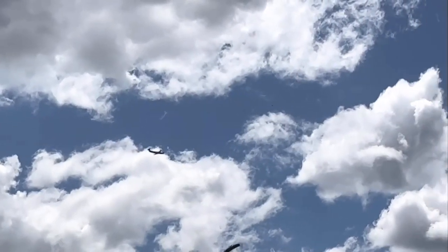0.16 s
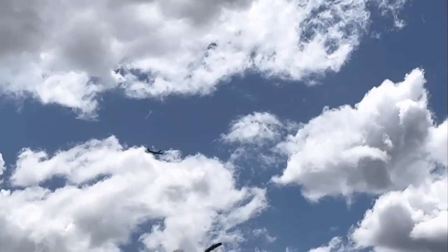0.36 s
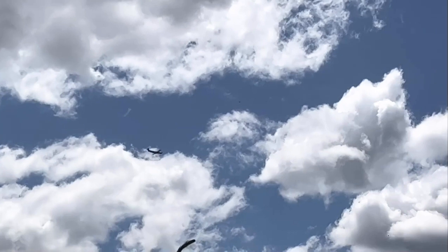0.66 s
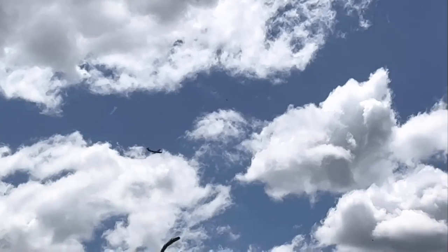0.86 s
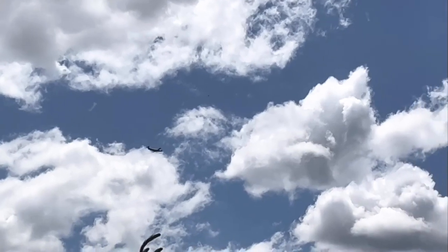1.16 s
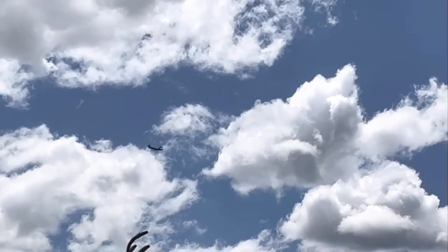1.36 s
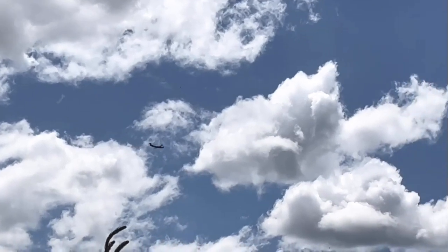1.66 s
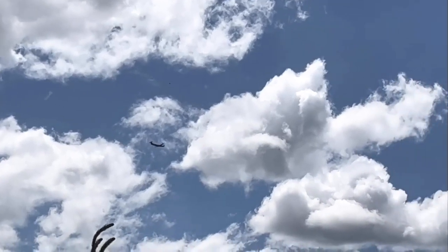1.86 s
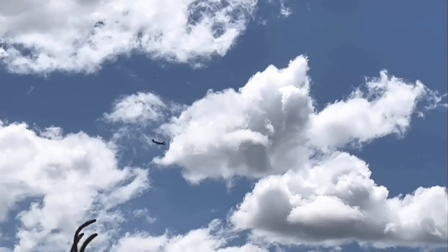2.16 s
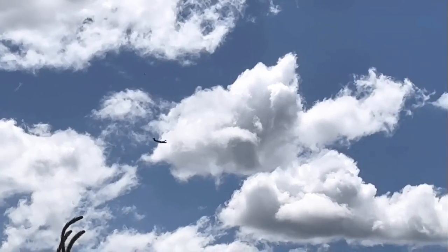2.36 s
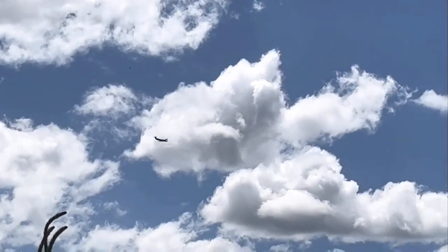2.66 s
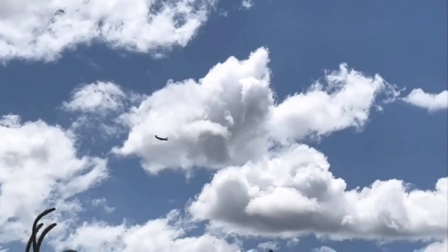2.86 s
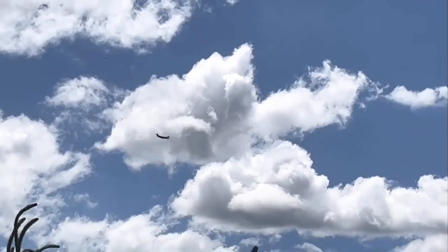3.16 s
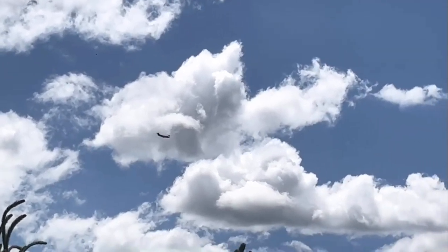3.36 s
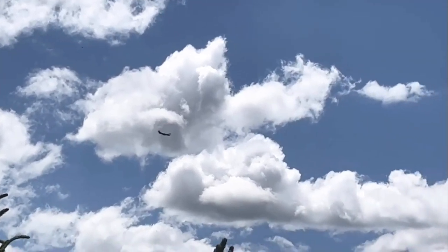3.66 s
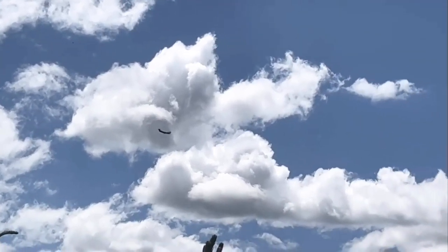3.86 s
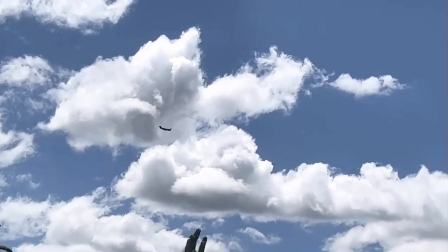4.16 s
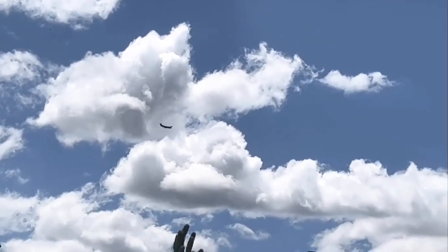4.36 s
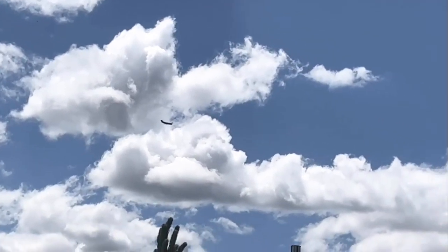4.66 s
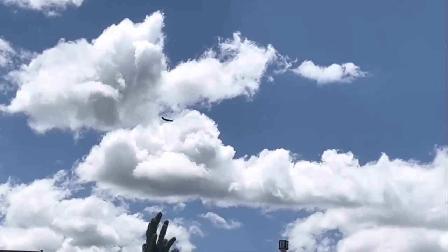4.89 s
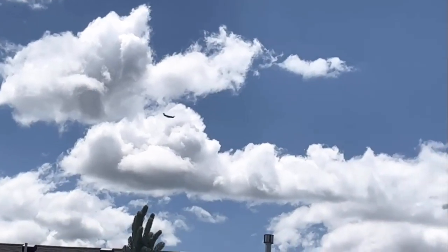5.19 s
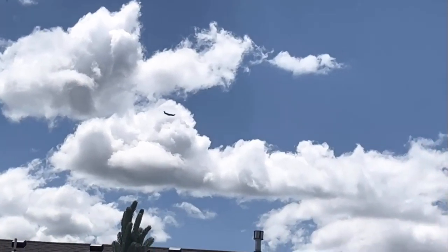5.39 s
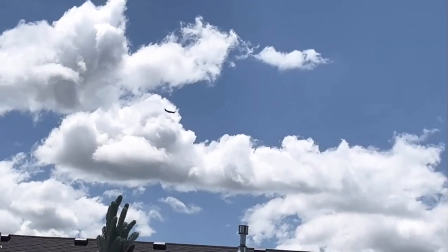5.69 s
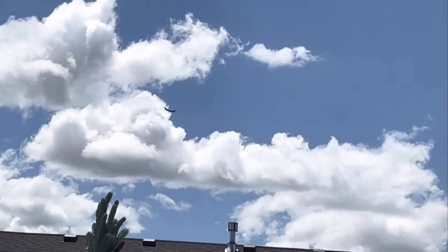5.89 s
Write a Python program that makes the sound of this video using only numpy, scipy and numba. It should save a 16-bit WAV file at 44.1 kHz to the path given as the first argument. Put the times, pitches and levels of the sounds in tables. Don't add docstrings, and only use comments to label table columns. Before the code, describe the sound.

Outdoors in a garden, a distant twin-engine propeller plane climbs away with a low, throbbing drone that slowly sinks in pitch. Its soft airy roar swells and fades unevenly. Wind rumbles on a hand-held phone microphone, with bursts of heavy dull thumps from about one to four seconds. Then wind and plane thin out over a faint steady murmur, with a last small swell of roar.

```python
import sys
import numpy as np
from scipy import signal
from scipy.fft import rfft, irfft, next_fast_len
from scipy.io import wavfile
from scipy.ndimage import uniform_filter1d
from numba import njit

SR = 44100
rng = np.random.default_rng(int(sys.argv[2]) if len(sys.argv) > 2 else 0)


def amplitude_ratio(level_db):
    exponent = np.asarray(level_db, float) / 20
    return 10 ** exponent


def persist_wave(psi):
    counts = np.round(np.clip(psi, -1, 1) * 32767).astype(np.int16)
    wavfile.write(sys.argv[1], SR, np.atleast_2d(counts).T)


N = 265906
TIME_S = np.arange(N) / SR
CONTROL_S = np.arange(0, N, 64) / SR


def level(x, db):
    return x * amplitude_ratio(db) / np.sqrt(np.mean(x ** 2))


def spread(control):
    return np.interp(TIME_S, CONTROL_S, control)


def walk(rate):
    hold = int(SR / rate)
    held = np.repeat(rng.standard_normal(N // hold + 1), hold)
    slewed = uniform_filter1d(uniform_filter1d(held, hold), hold)
    return level(slewed[:N], 0)


def coloured(colour):
    size = next_fast_len(N)
    octave = np.log2(np.maximum(np.arange(size // 2 + 1) * SR / size, 1))
    hz, db = np.transpose(colour)
    gain = amplitude_ratio(np.interp(octave, np.log2(hz), db))
    return rfft(rng.standard_normal(size)) * gain, octave, size


@njit
def svf(x, hz, sharp):
    y, band, low = np.empty(len(x)), 0., 0.
    for i in range(len(x)):
        g = np.tan(np.pi * hz[i] / SR)
        v = (band + g * (x[i] - low)) / (1 + g * (g + sharp))
        band, low, y[i] = 2 * v - band, low + 2 * g * v, sharp * v
    return y


def propellers():
    # time in seconds, level of the blade tone in dB, second harmonic minus that level in dB.
    drone = [(0, -36.5, -15), (.3, -34.5, -3.5), (.47, -39, 1.5), (.75, -29.5, -8), (1.2, -28, -10.5),
             (1.6, -25.5, -10.5), (1.95, -27.5, -17), (2.38, -33, -7), (2.55, -27.5, -8), (2.72, -41, -1),
             (3.0, -34, -9.5), (3.35, -35.5, -15), (3.65, -56, 1.5), (4.3, -43.5, 1), (4.68, -49.5, -1.5),
             (4.95, -55.5, 5), (5.58, -53.5, 4), (5.85, -43, -3)]
    near_hz, far_hz, sink_s = 131.52, 126.04, 3.2
    hz = far_hz + (near_hz - far_hz) * np.exp(-TIME_S / sink_s)
    phase = 2 * np.pi * np.cumsum(hz) / SR

    s, first_db, over_db = np.transpose(drone)
    first_db = np.interp(TIME_S, s, first_db)
    over_db = np.interp(TIME_S, s, over_db)
    beat_hz, beat_dip_s, beat_db = 2.2, 0.17, 1
    throb_db = -beat_db * np.cos(2 * np.pi * beat_hz * (TIME_S - beat_dip_s))
    second_db = first_db + over_db + throb_db
    bass_lift_db = clear_air()[0]
    third_db = -58 + 1.1 * bass_lift_db + 3 * walk(5)

    out = 0
    for k, db in enumerate((first_db, second_db, third_db), start=1):
        twinkle_db = 1.3 * (k - .5) * walk(16)
        waver = .1 * k ** 2 * walk(25)
        out = out + np.sqrt(2) * amplitude_ratio(db + twinkle_db) * np.sin(k * phase + waver)
    return out


def roar():
    # Hz, dB per Hz.
    air = [(60, -30), (180, -2.5), (330, -5), (600, -11), (750, -16), (980, -14), (1130, -17.5),
           (1340, -35), (1660, -22.5), (1900, -34), (2250, -34.5), (2800, -51.5), (3500, -64), (4600, -110)]
    anchors_hz = [170, 330, 600, 1000, 1800, 3200]
    shares = [(0.61, 1.05, 0.43, .01, .01, .01), (.01, .01, .5, 1.18, 0.22, .01),
              (.01, .01, .01, .01, 0.65, 1.1)]
    roar_db, fade_db_per_s = -54.5, 0.81
    lifts_db = clear_air()
    noise, octave, size = coloured(air)
    around_1_khz = (octave > 9.68) * (octave < 10.29)
    noise = noise / np.std(irfft(noise * around_1_khz, size))
    out, shared = 0, walk(9)
    for centre in np.arange(5, 12.5, 1 / 3):
        band = np.clip(1 - 3 * abs(octave - centre), 0, 1)
        piece = irfft(noise * band, size)[:N]
        weights = [np.interp(centre, np.log2(anchors_hz), row) for row in shares]
        flicker_db = 0.29 * shared + 0.85 * walk(8) + 2.7 * walk(30)
        out = out + piece * amplitude_ratio(weights @ lifts_db + flicker_db)
    return out * amplitude_ratio(roar_db - fade_db_per_s * TIME_S)


def clear_air():
    # centre in seconds, length in seconds, lift in dB of the bass, the middle and the top.
    swells = [(0.082, 0.058, -5, 7.5, 1), (0.269, 0.06, -1, -1, -9), (0.422, 0.055, 3.5, 13.5, 4),
              (.6, 0.14, 1.5, 0.5, 7.5), (0.799, 0.025, 1, 7.5, -0.5), (.915, 0.073, 6.5, 13.5, 7),
              (1.071, 0.11, 7, 9.5, 19), (1.215, .035, 6.5, 7, 4), (1.4, 0.092, 6.5, 6.5, 1),
              (1.561, 0.059, 9, 9, 7), (1.702, 0.086, 8, 4, 10), (1.88, 0.065, 9.5, 4.5, 3),
              (2.12, 0.064, 3.5, 4, 6), (2.598, 0.077, 10.5, 6, 8), (2.72, 0.074, 3.5, 5, 10.5),
              (2.88, 0.1, 6.5, 10, 4), (3.065, 0.12, 1, 4, 6), (3.702, 0.13, 3.5, 4, 5),
              (3.995, .06, 0, 6.5, 3), (4.142, 0.061, 9, 11, 7), (4.278, 0.089, 10, 8, 12),
              (4.429, 0.053, 0.5, 0.5, 5), (2.0, 0.074, 4.5, 2, 3), (5.92, 0.17, 8.5, -0.5, 4)]
    rise_over_fall = 0.79
    lifts_db = 0
    for s, length, *db in swells:
        width = length * np.where(CONTROL_S < s, rise_over_fall, 1)
        bump = np.exp(-.5 * ((CONTROL_S - s) / width) ** 2)
        lifts_db = lifts_db + np.outer(db, bump)
    return np.array([spread(db) for db in lifts_db])


def wind():
    strength, swirl_hz = gusts()
    hz = np.clip(swirl_hz * 2 ** (0.083 * walk(17)), 25, 400)
    swirl = svf(svf(rng.standard_normal(N), hz, .9), hz, 1.5) * amplitude_ratio(2.2 * walk(30))
    swirl = signal.sosfilt(signal.butter(2, 350, fs=SR, output="sos"), swirl)

    rush_hz, rush_db, rush_power = 3.26 * hz, -10.5, 1.3
    rush = svf(svf(rng.standard_normal(N), rush_hz, 1.1), rush_hz, 1.1) * amplitude_ratio(2.6 * walk(40))
    rush = signal.sosfilt(signal.butter(4, 600, fs=SR, output="sos"), rush)
    rush = level(rush, rush_db) * (strength / strength.max()) ** (rush_power - 1)
    return (level(swirl, -0.32) + rush) * strength


def gusts():
    # start in seconds, hold in seconds, level in dB, centre of the rumble in Hz.
    gust_list = [(0, .06, -40, 59.4), (0.122, 0.28, -49.5, 60), (0.611, .14, -37, 65),
                 (0.804, .1, -39.5, 59.3), (0.953, .25, -40, 57.7), (1.276, 0.35, -29.5, 59.8),
                 (1.62, .45, -36, 61.3), (2.15, .25, -36, 60), (2.46, .2, -29, 62),
                 (2.698, 0.25, -28, 59.2), (3.039, 0.23, -34, 59.1), (3.386, 0.063, -31.5, 58),
                 (3.631, 0.18, -35, 57.25), (3.898, .22, -49, 60), (4.479, .2, -41.5, 105),
                 (4.753, .65, -53.5, 89.7), (5.5, .3, -47.5, 125), (5.9, .15, -50, 60)]
    rise_db_per_s, fall_db_per_s = 220, 129
    calm_db, calm_hz = -60.5, 85
    power = np.full(len(CONTROL_S), amplitude_ratio(calm_db) ** 2)
    pitch = power * calm_hz
    for s, hold, db, hz in gust_list:
        before_s = np.maximum(s - CONTROL_S, 0)
        after_s = np.maximum(CONTROL_S - s - hold, 0)
        gust = amplitude_ratio(db - rise_db_per_s * before_s - fall_db_per_s * after_s) ** 2
        power = power + gust
        pitch = pitch + hz * gust
    return spread(np.sqrt(power)), spread(pitch / power)


def buffets():
    # peak time in seconds, peak level in dB, length in ms.
    eddies = [(1.257, -14, 7.1), (1.355, -17, 17), (1.373, -27, 21), (1.392, -13, 4.5), (1.421, -20, 11),
              (1.453, -25, 9), (1.547, -21.5, 24), (1.581, -31, 10), (1.67, -13, 13.4), (1.708, -20.5, 19),
              (1.738, -25, 3.9), (2.483, -11, 19), (2.54, -10.5, 11), (2.557, -8, 3.8), (2.594, -9.5, 3.5),
              (2.632, -8, 12), (2.653, -14, 12), (2.672, -16.5, 6.9), (2.706, -13, 6.5), (2.721, -19.5, 16),
              (2.752, -17, 4.9), (2.789, -10.5, 4.8), (2.879, -24, 10), (2.934, -26.5, 27),
              (3.164, -15.5, 5.2), (3.438, -26, 23), (3.62, -18, 4.4), (3.643, -20.5, 27), (3.701, -19, 17),
              (3.755, -17, 15.7)]
    # peak time in seconds, peak level in dB, pitch in Hz.
    flicks = [(.208, -41.5, 690), (.342, -29.5, 610), (2.618, -24, 550), (3.155, -31.5, 300),
              (3.196, -26, 283), (3.204, -18, 191), (3.304, -31, 350), (3.321, -21, 197), (3.352, -22, 240),
              (3.357, -31, 520), (3.368, -19.5, 326), (3.37, -14.5, 196), (3.611, -21.5, 416),
              (3.656, -29, 400), (3.693, -26, 323), (3.733, -17.5, 270), (3.734, -24, 520),
              (5.934, -39, 590)]
    flick_cycles = 1.62
    events = [(s, db, 84.3 + 190 / ms, ms) for s, db, ms in eddies]
    events += [(s, db, hz, 1000 * flick_cycles / hz) for s, db, hz in flicks]
    out = np.zeros(N)
    reach = 3500
    t = np.arange(-reach, reach) / SR
    for (s, db, hz, ms), turn in zip(events, rng.random(len(events))):
        width = np.clip(ms, 2, 30) / 1000 * np.where(t < 0, .35, .5)
        phase = 2 * np.pi * (hz * (t - .13 * t ** 2 / width[-1]) + turn)
        swing = np.exp(-.5 * (t / width) ** 2) * np.sin(phase)
        at = int(s * SR) - reach
        out[at:at + len(t)] += amplitude_ratio(db - 0.77) * swing
    return signal.sosfilt(signal.butter(4, 1100, fs=SR, output="sos"), out)


def tick():
    start_s, hz, db, decay_s = .277, 9600, -66, .0015
    t = np.maximum(TIME_S - start_s, 0)
    return amplitude_ratio(db) * np.sin(2 * np.pi * hz * t) * np.exp(-t / decay_s)


def garden():
    # Hz, dB per Hz.
    murmur = [(30, -21), (70, -10), (200, 8), (600, -15), (1100, -18), (1340, -16.5), (1650, -13),
              (2400, -28), (2750, -46), (3500, -66.5), (4500, -100)]
    noise, _, size = coloured(murmur)
    return level(irfft(noise, size)[:N] * amplitude_ratio(2.1 * walk(3.9)), -49.5)


def scene():
    return (propellers() + roar() + wind() + buffets() + tick() + garden())[None]


def band_limit(x):
    return signal.sosfilt(signal.butter(12, 12317, fs=SR, output="sos"), x)


def record(dry):
    # Hz, dB per Hz.
    hiss_colour = [(30, 8), (3500, 0), (5400, -1.5), (6100, -8.5), (6900, -9.5), (8000, -6), (10500, -8.5),
                   (12300, -12.5)]
    mirror_hz, mirror_db = 9600, -62
    x = signal.sosfilt(signal.butter(3, 40, "high", fs=SR, output="sos"), dry)
    x = x * (1 + amplitude_ratio(mirror_db) * np.cos(2 * np.pi * mirror_hz * TIME_S))
    noise, _, size = coloured(hiss_colour)
    hiss = level(irfft(noise, size)[:N], -85)
    return band_limit(x + hiss)


dry = scene()
out = record(dry)
persist_wave(out)
```